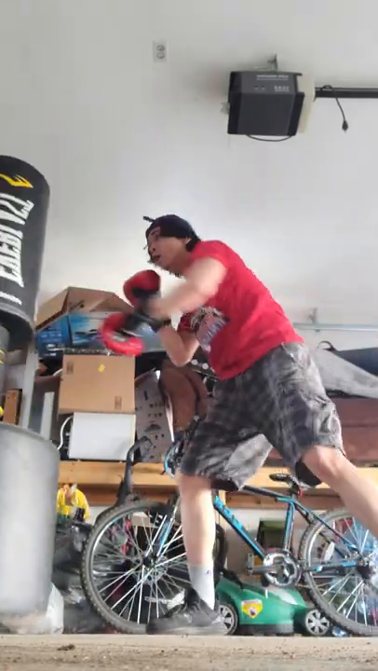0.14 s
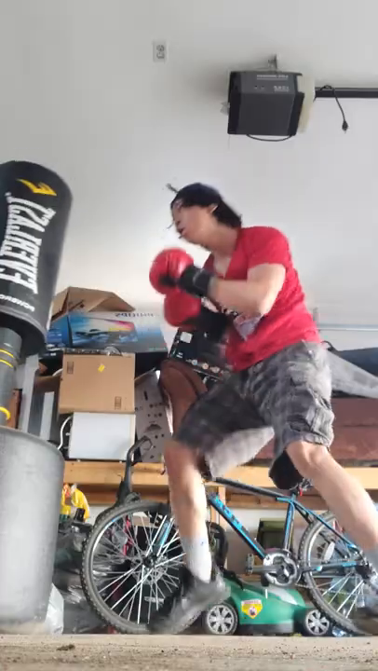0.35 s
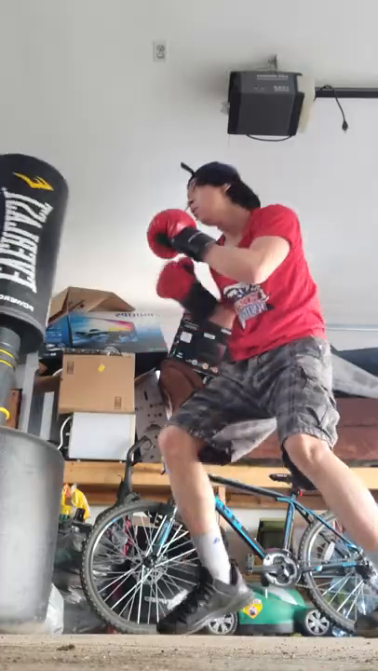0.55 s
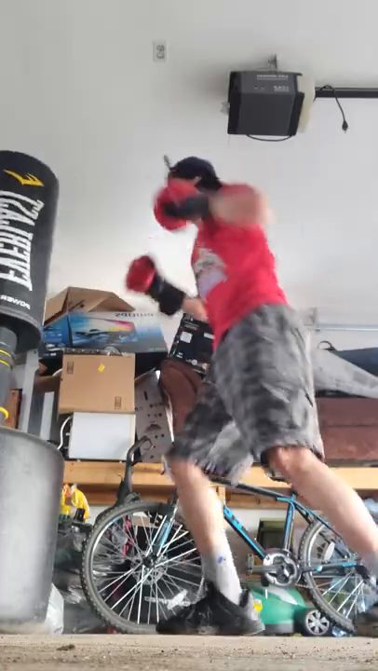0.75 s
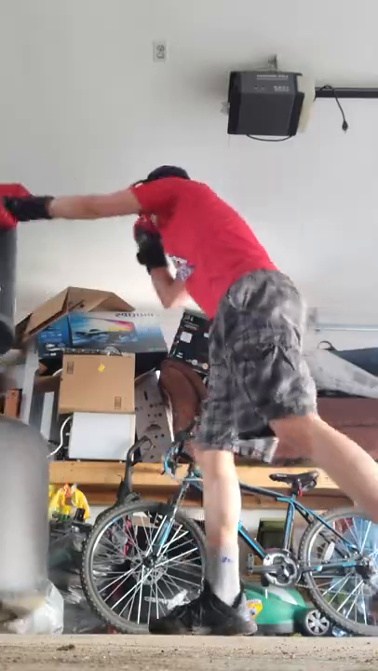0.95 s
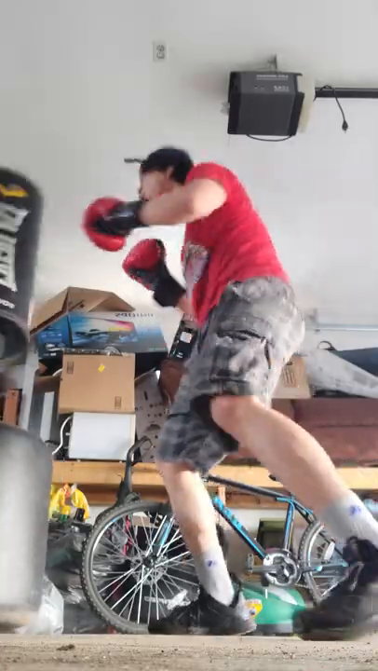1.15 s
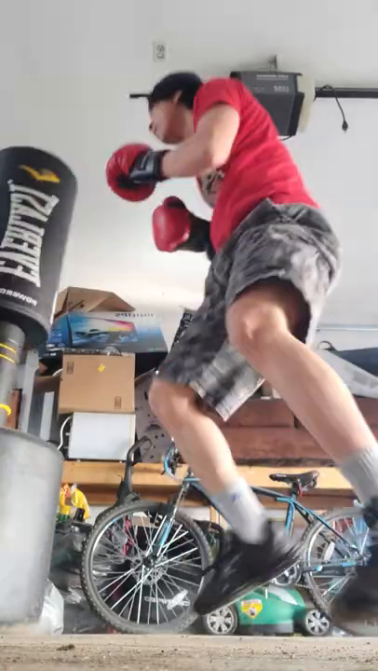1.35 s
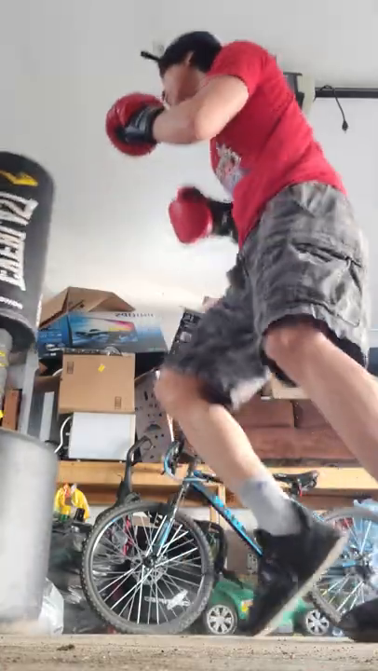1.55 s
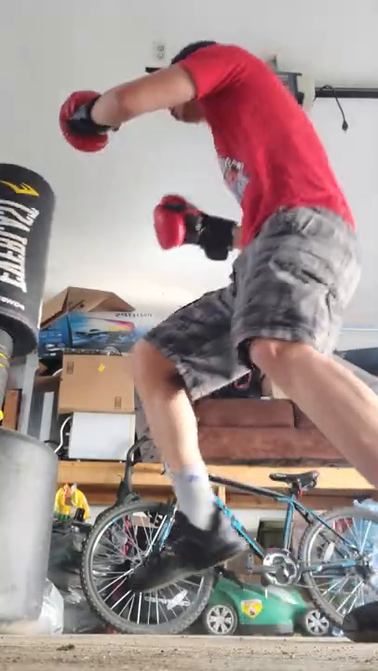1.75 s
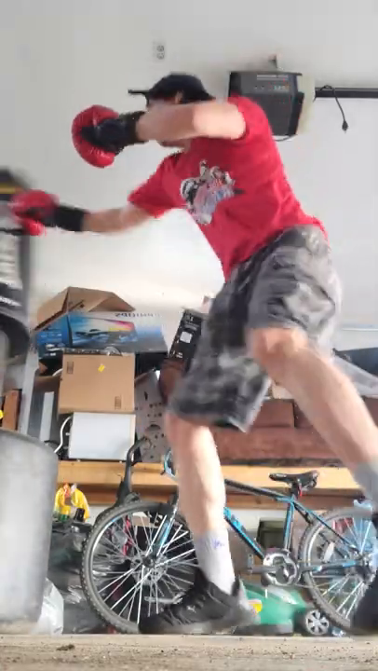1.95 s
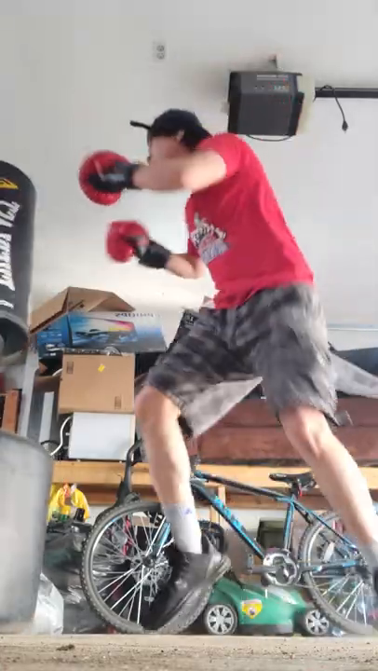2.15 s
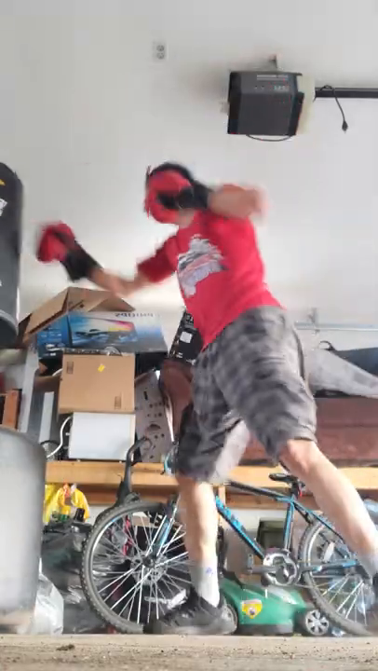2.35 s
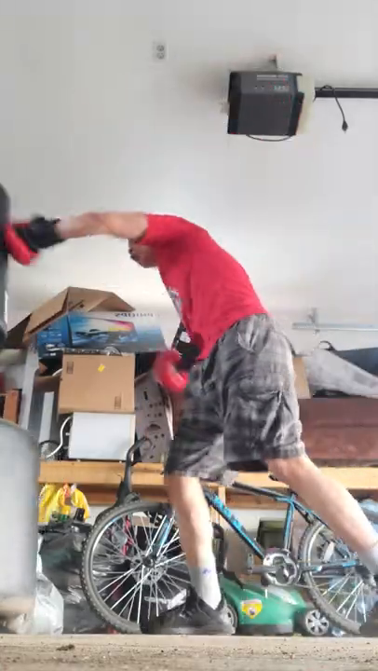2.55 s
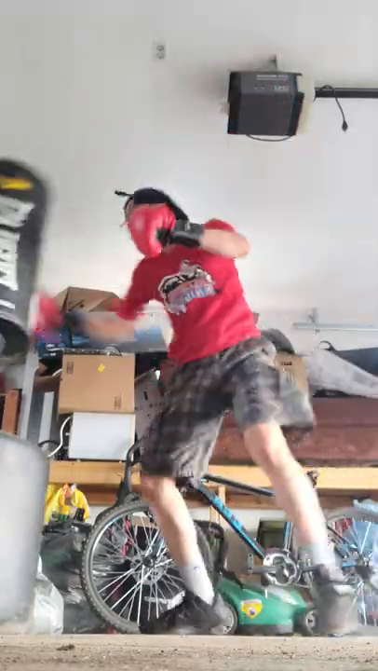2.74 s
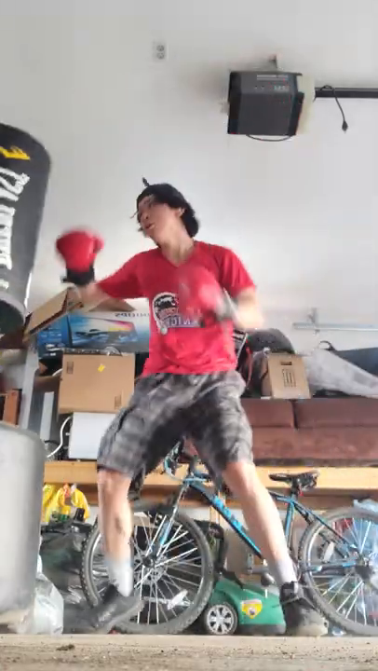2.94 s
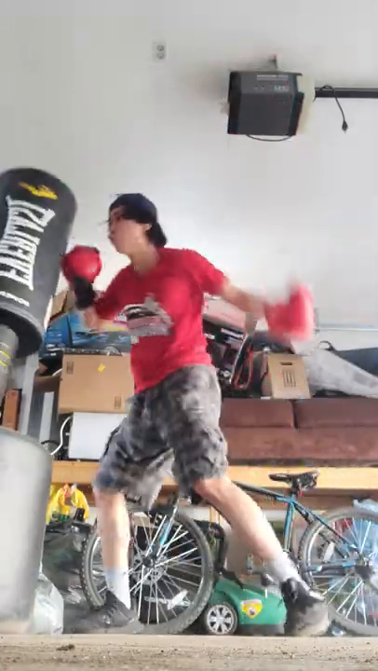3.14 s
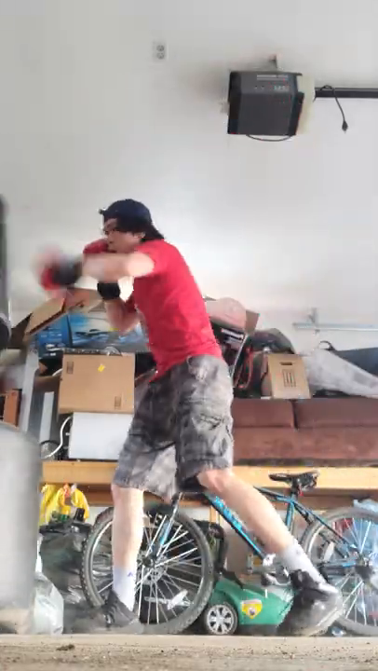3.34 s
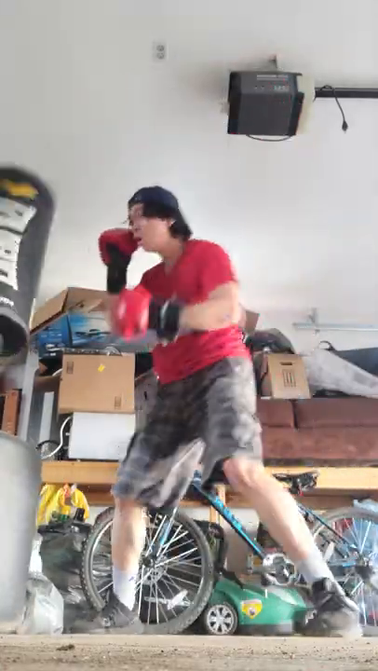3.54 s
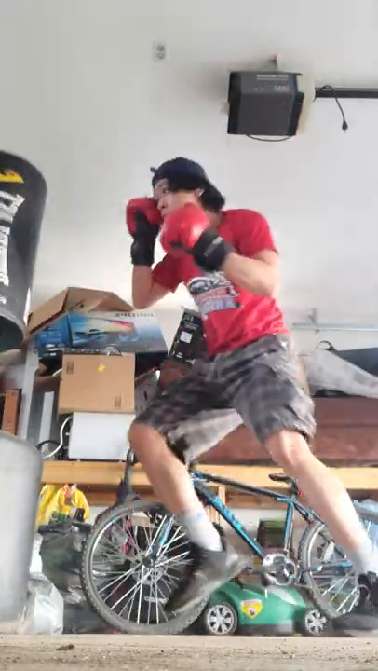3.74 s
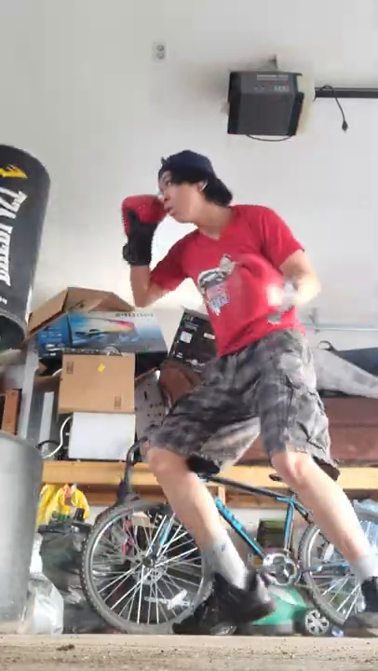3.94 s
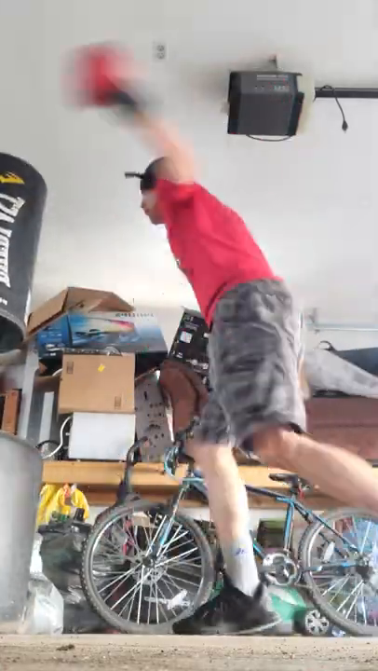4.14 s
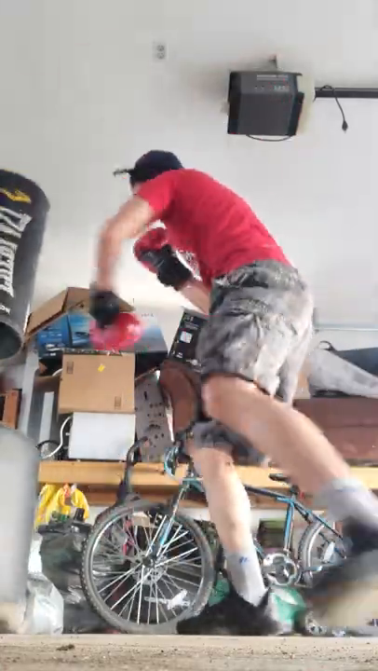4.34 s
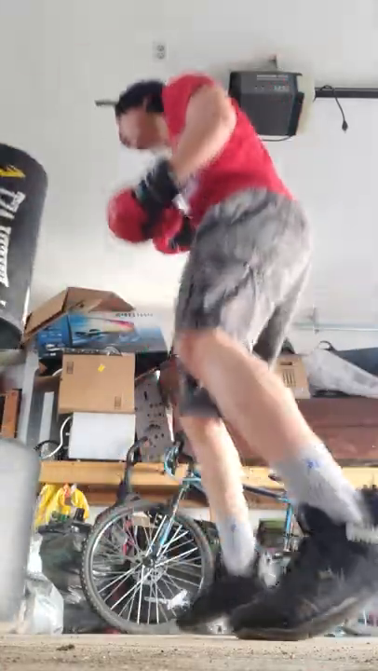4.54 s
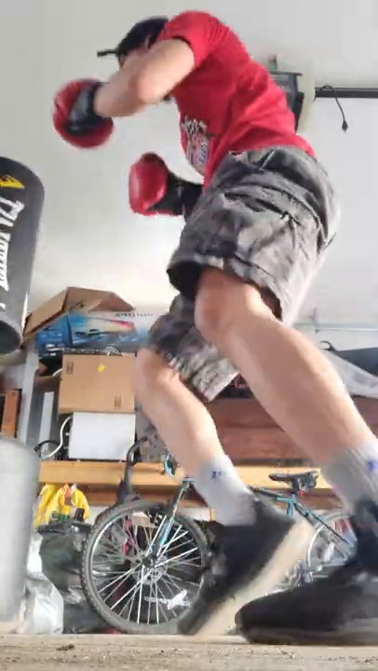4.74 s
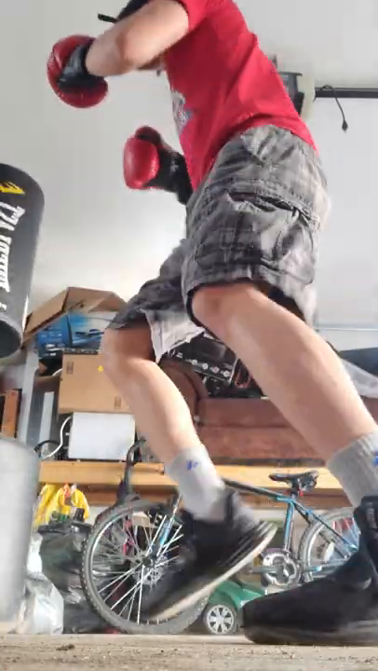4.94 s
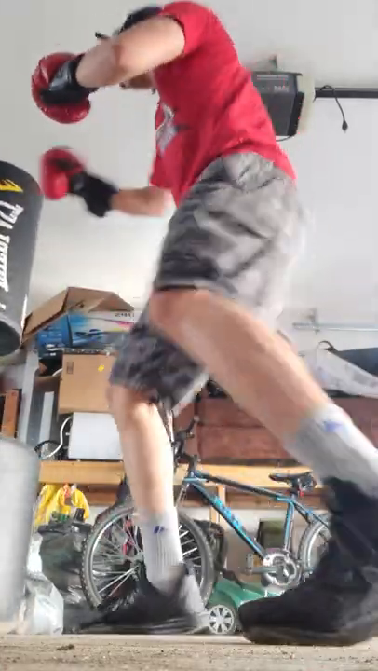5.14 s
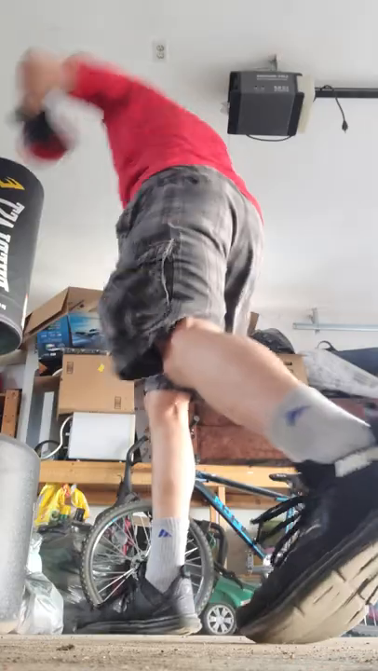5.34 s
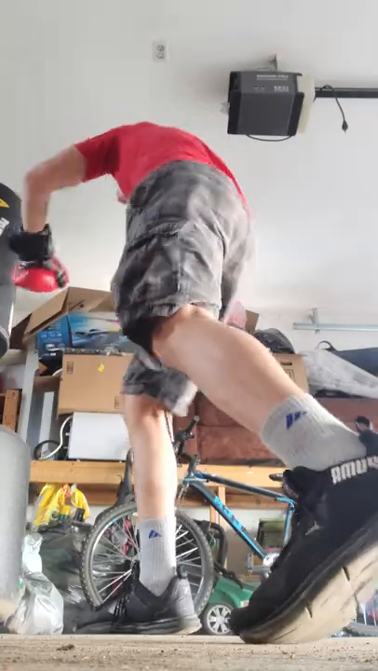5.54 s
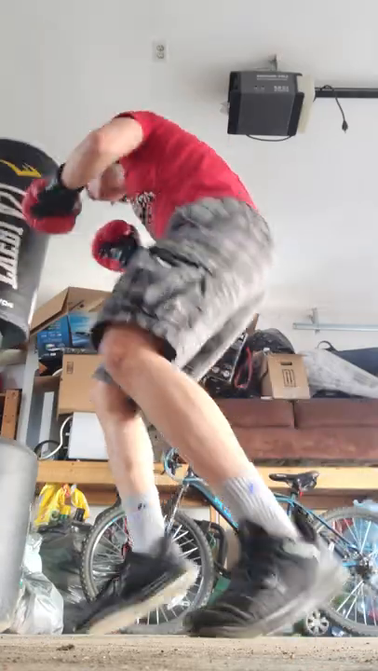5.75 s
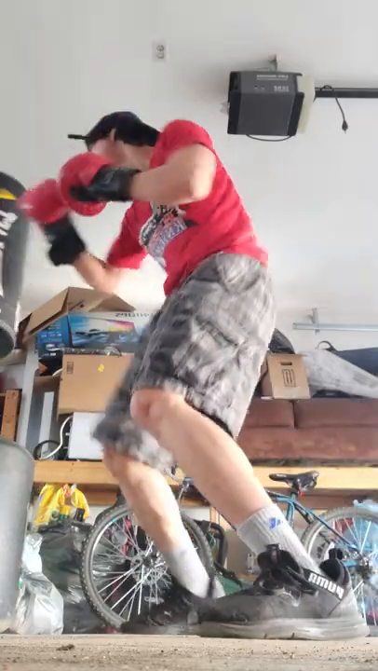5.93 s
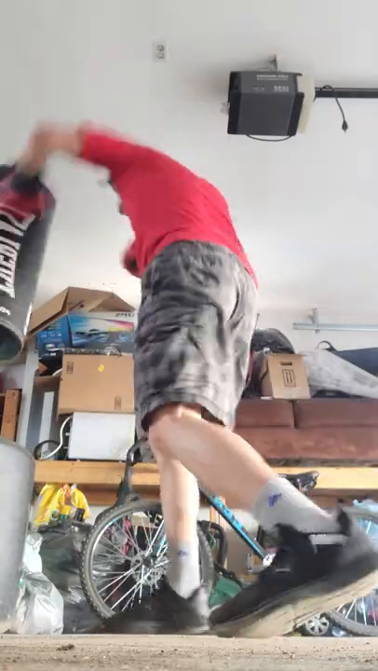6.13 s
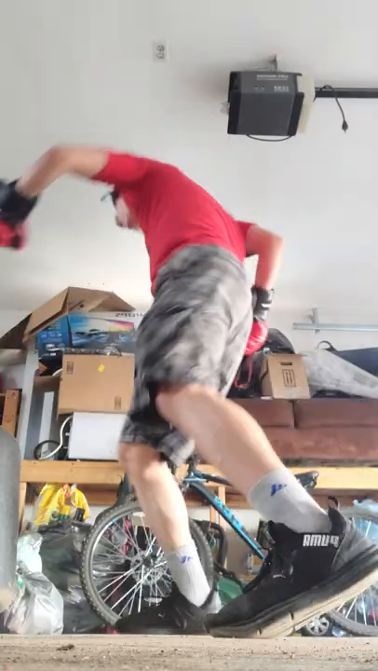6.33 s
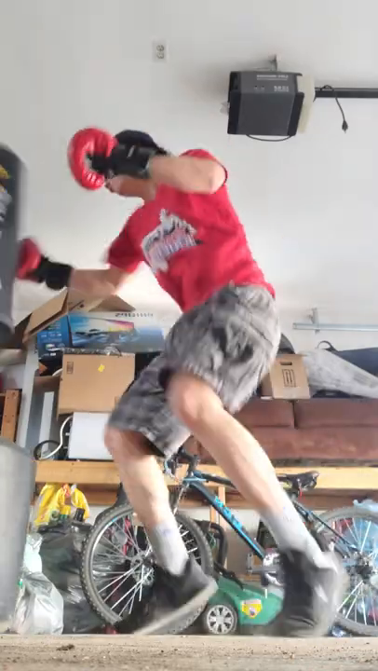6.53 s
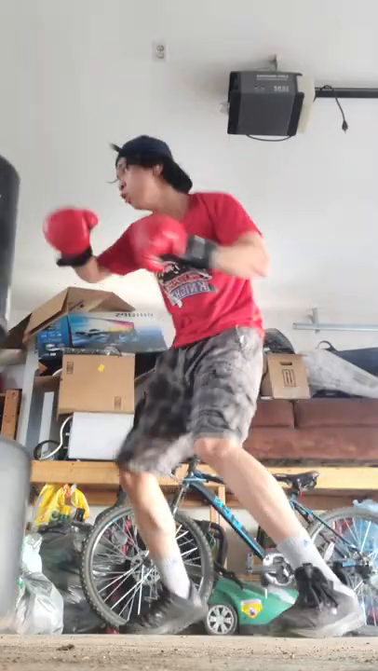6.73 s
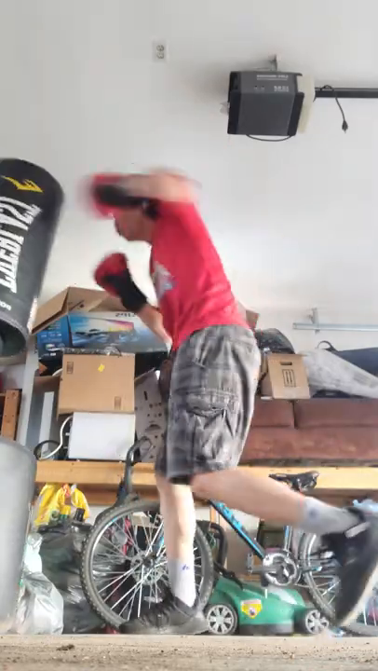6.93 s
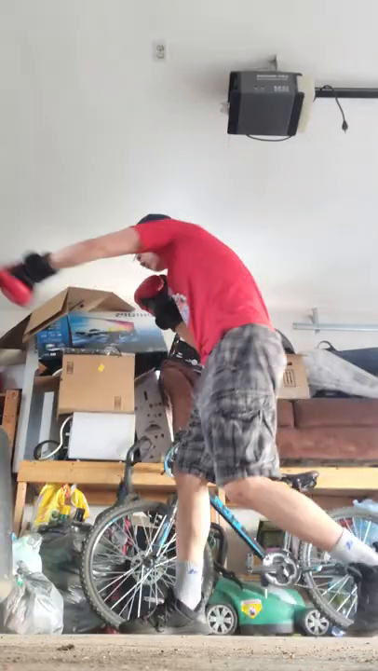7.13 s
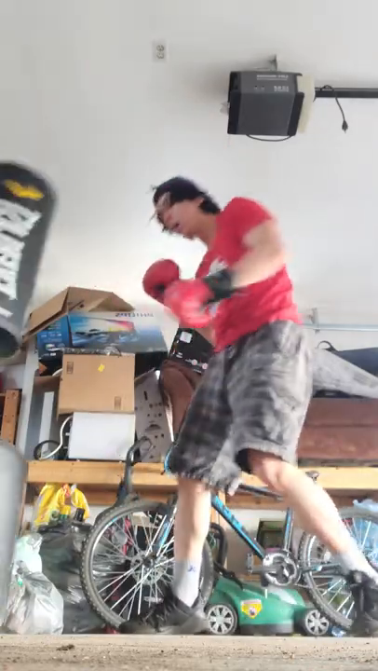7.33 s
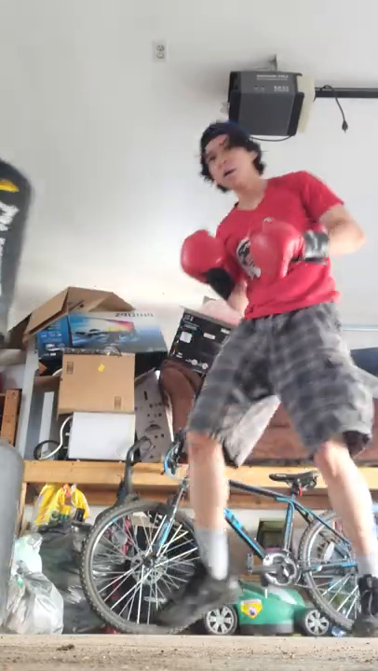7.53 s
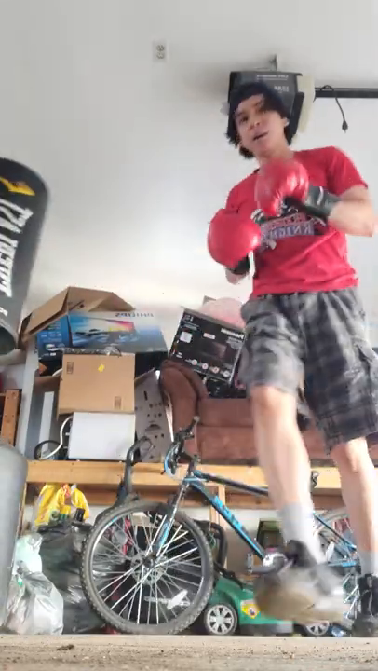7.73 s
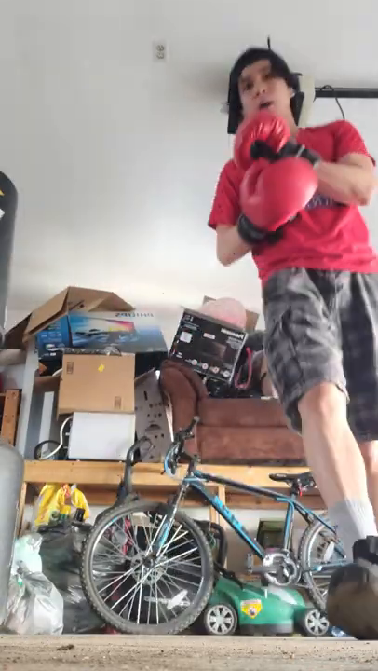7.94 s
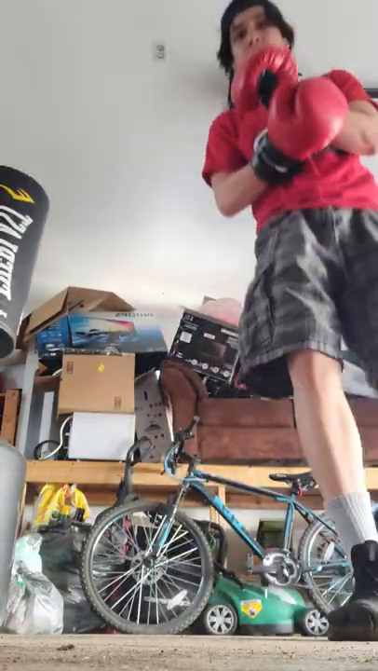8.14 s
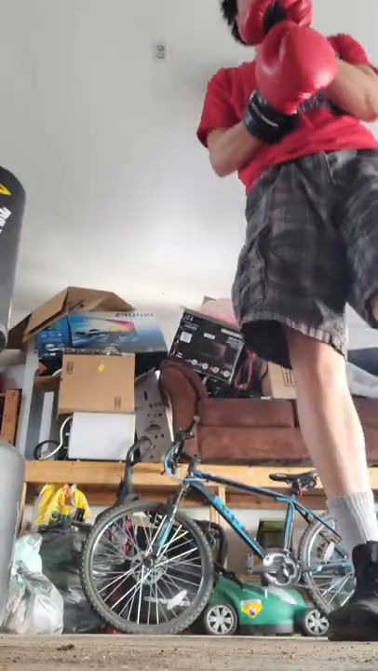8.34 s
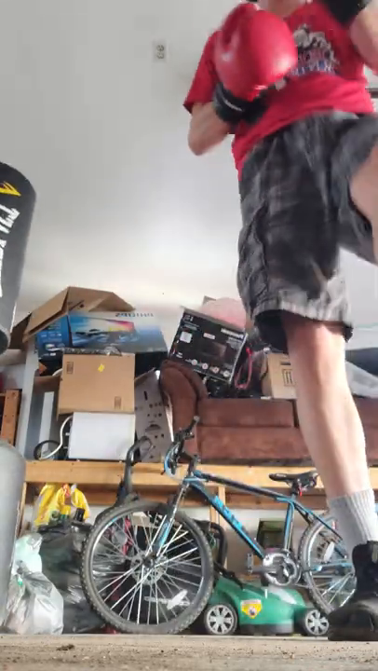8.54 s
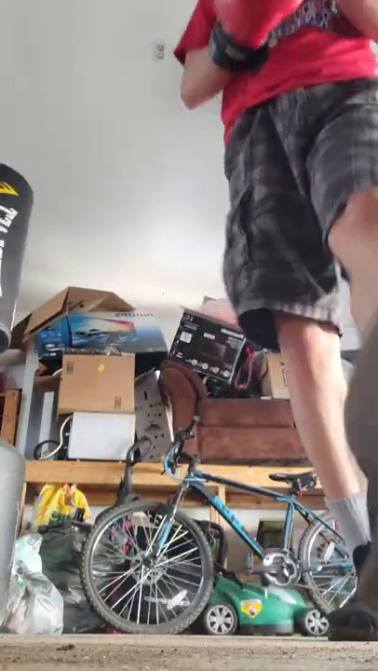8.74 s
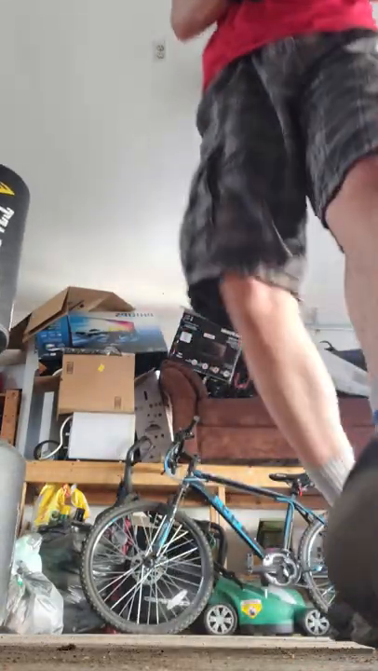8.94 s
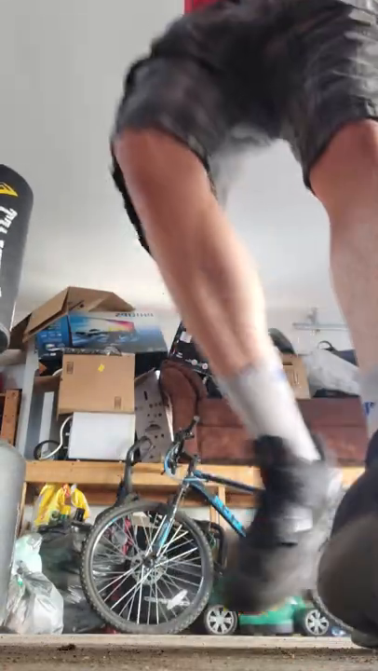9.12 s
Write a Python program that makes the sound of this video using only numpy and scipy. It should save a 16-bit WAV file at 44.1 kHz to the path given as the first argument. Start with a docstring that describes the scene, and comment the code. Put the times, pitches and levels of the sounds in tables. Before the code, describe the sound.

A boxing glove cracks against a heavy vinyl bag right at the start, and again at about 0.9 seconds. Each punch is a sharp, close slap with a low thud and boom, some trailed by a tiny squeak. A quick flurry of slightly lighter blows runs from 2 to 2.8 seconds. Hard single hits land at 3.3, 4.3 and 5.4 seconds, then three closer together at 6.2, 6.6 and 7 seconds. Throughout, the bag's weighted base and the boxer's feet thump dully on the floor, while shoes scuff, rasp and crunch grit on concrete and clothes rustle lightly. After the last punch, a few thumps fade by about 8 seconds, leaving quieter scrapes and gritty ticks until the end, just past 9 seconds. The microphone is near the feet and bag. The garage adds a short echo, with a faint steady outdoor rumble behind.

```python
"""A garage with a concrete floor: a boxer works a free-standing heavy bag, a phone lying by his feet.
Each glove cracks on the vinyl, slaps air out and sets the stuffed bag booming; the skin squeaks, and
the weighted base rocks and thumps back down. Shoes scuff over grit, and the garage answers over a
quiet outdoor rumble."""
import sys
import numpy as np
from scipy import signal
from scipy.fft import rfft, irfft, next_fast_len
from scipy.io import wavfile
from scipy.ndimage import uniform_filter1d

SR = 44100
rng = np.random.default_rng(int(sys.argv[2]) if len(sys.argv) > 2 else 0)


def store_pcm(level_fs):
    """Save levels as 16-bit WAV."""
    pcm = np.round(np.clip(level_fs, -1, 1) * 32767).astype(np.int16)
    wavfile.write(sys.argv[1], SR, np.atleast_2d(pcm).T)


N = 404823

# Gloves on the bag. Each row: start in seconds, then levels in dB of the crack, boom, slap, sizzle,
# body thud, spit, wall echo and ceiling echo.
PUNCHES = [(0.0101, -0.5, -11.5, -25, -28.5, -17, -23, -17, -17),
           (0.9026, 1.5, -14, -28, -21.5, -21.5, -11, -10.5, -18),
           (1.99, -7, -16, -27.5, -32, -15.5, -20, -27, -28),
           (2.2965, -9, -15.5, -48, -50, -20, -23, -36, -42),
           (2.51, -1.5, -12.5, -29.5, -26.5, -19, -13, -10, -18),
           (2.5454, -7, -21, -35, -29, -23, -28, -31, -36),
           (2.8203, -5, -12.5, -24, -32.5, -18, -32, -23, -28),
           (3.3319, 0, -14.5, -29.5, -20.5, -19, -7, -25, -12),
           (4.2643, 1, -15.5, -29, -27, -17.5, -22, -34, -17),
           (5.4399, 1, -18, -32, -22.5, -17, -32, -15, -18),
           (6.198, -0.5, -16.5, -34, -28, -18.5, -24, -14, -18),
           (6.5714, -3, -14, -24, -24, -18.5, -17, -24, -18),
           (7.029, -2.5, -23.5, -51, -28, -19, -10, -19, -18)]
# Base and feet landing. Each row: start in seconds, knock in dB, boom in dB, boom pitch in Hz,
# clatter in dB, knock t60 in seconds, knock brightness in dB per octave, edge in dB.
LANDINGS = [(.022, -17, -37, 81.3, -32, .16, -1.5, -31), (.039, -22.5, -16, 81, -40, 0.12, -5, -27),
            (.121, -29.5, -31, 90, -55, 0.085, 1, -20), (.222, -19, -11.5, 50.5, -32.5, 0.093, 0, -22),
            (.249, -20.5, -30, 59.6, -49, 0.14, -4, -28), (.776, -44, -35.5, 82, -71, 0.26, 0.5, -30),
            (1.031, -41, -30, 61.5, -32, 0.036, 9, -40), (1.091, -33.5, -32, 69, -62, 0.14, 0, -31),
            (1.164, -42, -50, 70, -63, .06, 6, -30), (1.245, -17, -12, 89.3, -30.5, 0.15, 1, -12),
            (1.446, -28, -16, 71.5, -40, 0.24, 2, -34), (1.605, -35.5, -32, 119, -42.5, 0.15, -0.5, -34),
            (1.853, -44, -54, 100, -50, 0.073, 2, -38), (2.098, -25.5, -22, 78, -30, 0.078, 0.5, -15),
            (2.194, -26, -16, 82, -40, 0.28, 2.5, -35), (2.328, -16, -38, 64, -35, 0.13, 1, -7.5),
            (2.346, -21.5, -40, 70, -43, 0.23, -2.5, -10.5),
            (2.544, -19.5, -21, 90, -47, 0.13, -3.5, -12.5), (2.929, -36.5, -21, 70, -55, 0.21, -4, -41),
            (3.052, -24, -16.5, 104.1, -34.5, 0.22, 3.5, -35), (3.133, -62, -21.5, 59.4, -70, 0.11, 0, -55),
            (3.595, -30, -18.5, 85.2, -42, 0.27, -1, -38), (3.795, -22, -14, 87, -31, 0.13, 0, -37),
            (3.956, -43, -51, 125, -43, 0.037, 4, -27), (4.484, -22, -25, 131.5, -37, 0.18, -1.5, -29),
            (4.538, -37.5, -22, 138, -37, 0.061, 13, -42), (4.673, -55, -28.5, 79.5, -62, 0.13, 3, -43),
            (4.793, -41, -35, 70.7, -46.5, 0.21, 4.5, -28.5), (5.189, -41, -33.5, 105, -54, 0.05, 0, -52),
            (5.625, -26, -49, 59, -55, 0.14, 2, -13.5), (5.749, -35.5, -23, 96.6, -41, 0.097, 4.5, -36),
            (5.913, -29.5, -18.5, 57.5, -40.5, 0.23, -0.5, -32),
            (5.993, -33.5, -40, 80, -59, 0.12, -4, -23.5), (6.29, -37, -46, 67.5, -40.5, 0.5, 1, -37),
            (6.392, -32, -25, 118, -58, 0.088, -2.5, -30), (6.555, -23, -9.5, 74.4, -43, 0.081, 2.5, -40),
            (6.795, -24, -27, 97.6, -37, 0.34, -2, -16), (7.044, -16, -29, 121, -26, 0.096, -1, -17),
            (7.099, -29, -38, 62, -52, 0.31, -2.5, -37), (7.157, -34, -20.5, 63.95, -57, 0.077, -4, -31),
            (7.245, -33.5, -28, 75.5, -58, 0.12, 0.5, -22),
            (7.374, -24.5, -13.5, 95.9, -35.5, .22, 1.5, -16), (7.448, -53, -28, 67, -59, 0.11, -4, -41),
            (7.582, -41, -21, 79.6, -37.5, 0.32, 4, -32), (7.621, -28.5, -21, 129.8, -49, 0.19, 0.5, -28),
            (7.757, -31, -24, 95.5, -45, 0.26, -4, -31), (7.967, -35, -53, 124, -50, 0.062, -3, -44),
            (8.291, -44, -33, 57.4, -36.5, 0.14, 3, -39), (8.626, -45, -48, 70, -60, .06, 2, -46)]
# Colour of a glove's slap, also of a landing's clatter. Each row: frequency in Hz, level in dB.
SLAP_COLOUR = [(410, 3.5), (700, -5), (1160, -3), (1320, -12), (1590, -7.5), (1990, -4), (2450, -4),
               (4210, -7), (5780, -4), (8250, -15), (11800, -7.5), (15300, -16), (16400, -8)]
# Colour of a sole on grit. Each row: frequency in Hz, level in dB.
SOLE_COLOUR = [(710, -11), (1200, -2.5), (1900, 0.5), (2500, -3.5), (3210, -5), (3470, -4.5), (3740, -7),
               (5250, -6.5), (7620, -5.5), (8690, -9.5), (12100, -7.5), (15500, -5), (16400, -82)]


def undb(db):
    return 10 ** (np.asarray(db) / 20)


def gain(table, size):
    """Gain on FFT bins from (Hz, dB) points."""
    hz, db = np.transpose(table)
    return undb(np.interp(np.log(np.fft.rfftfreq(size, 1 / SR) + 1), np.log(hz), db))


def noise(table, size, grit_db=0.):
    """Coloured noise of rms 1; grit makes it a dense stream of uneven grains."""
    fast = next_fast_len(size)
    grains = rng.standard_normal(fast) * undb(grit_db * np.minimum(rng.exponential(size=fast), 4))
    coloured = irfft(rfft(grains) * gain(table, fast), fast)[:size]
    return coloured / np.sqrt(np.mean(coloured ** 2))


def shifted(table, spread=0.093, scatter_db=1.5):
    """No two blows land on the same spot: the resonances slide a little."""
    return sorted((hz * (1 + spread * np.tanh(rng.standard_normal())),
                   db + scatter_db * rng.standard_normal()) for hz, db in table)


def split(x, hz):
    """Below and above a crossover."""
    low = signal.sosfiltfilt(signal.butter(2, hz, fs=SR, output="sos"), x)
    return low, x - low


def curve(table):
    """One scene-long line per column, through rows that open with a time in seconds."""
    times, *columns = np.transpose(table)
    return [np.interp(np.arange(N) / SR, times, column) for column in columns]


def steps(count, hold, slew):
    """Random levels, with hold and slew in samples."""
    return uniform_filter1d(np.repeat(rng.standard_normal(count), hold), slew)


def walk(rate):
    """A scene-long drift that turns rate times a second."""
    hold = int(SR / rate)
    return steps(N // hold + 1, hold, hold)[:N]


def add(track, start, sound):
    """Mix a sound in at start seconds."""
    i = int(start * SR)
    a, b = max(i, 0), min(i + len(sound), N)
    track[a:b] += sound[a - i:b - i]


def fade(t, rise, t60):
    """Swell for about rise seconds, then die away; peak 1."""
    shape = (1 - np.exp(-t / rise)) * np.exp(-np.log(1000) * t / t60)
    return shape / shape.max()


def burst(x, shape):
    """Noise under an envelope, scaled to the energy of the envelope."""
    shaped = x * shape
    return shaped * np.sqrt(np.sum(shape ** 2) / np.sum(shaped ** 2))


def swell_power(events, rise, t60):
    """Summed power of swells that follow (seconds, dB) events."""
    out, t = np.zeros(N), np.arange(SR) / SR
    for start, db in events:
        add(out, start, (undb(db) * fade(t, rise, t60)) ** 2)
    return out


def outdoor_air():
    """Outdoor rumble through the door and faint hiss; only the upper part is wide."""
    # Colour of the air. Each row: frequency in Hz, level in dB.
    air_colour = [(15, -35), (25, -5.5), (80, 3.5), (338, -14.5), (432, -10), (875, -14.5), (1120, -12.5),
                  (1590, -21.5), (7260, -41.5), (8550, -115), (12500, -66), (15100, -68), (16400, -56)]
    mid, side = noise(air_colour, N), split(noise(air_colour, N), 650)[1]
    return undb(-46.5 + walk(8.6)) * (mid + side * np.array([[1], [-1]]))


def clutter(x):
    """Quick scatter off boxes, floor and boxer, crossfading to a new pattern as he moves."""
    move_s, colour = .27, [(60, -35.5), (600, -11.0), (16000, -1.5)]
    hop, t = int(move_s * SR), np.arange(SR // 16) / SR
    shape = fade(t, 0.00034, t60=0.032)
    shape *= undb(0.5) / np.sqrt(np.sum(shape ** 2))
    x, out = np.pad(x, (hop, 2 * hop)), np.zeros((2, N + 3 * hop + len(t)))
    for i in range(0, N + hop, hop):
        scatter = np.array([noise(colour, len(t)) * shape for _ in range(2)])
        part = x[i:i + 2 * hop] * np.sin(np.pi * np.arange(2 * hop) / (2 * hop))
        out[:, i:i + 2 * hop + len(t) - 1] += signal.fftconvolve(part[None], scatter, axes=1)
    return out[:, hop:hop + N]


def garage(x):
    """Scatter off the clutter, then a diffuse tail in six bands; the bass is alike on both sides."""
    # The room's tail. Each row: band centre in Hz, t60 in seconds, level in dB.
    tail_bands = [(80, 1, -22), (213, 0.42, -9), (504, 0.71, -11.5), (1740, 0.33, -6.5), (5100, 0.25, -2.5),
                  (13300, 0.18, -3)]
    t, tail = np.arange(SR) / SR, 0
    for hz, t60, db in tail_bands:
        band = [(hz / 3.3, -40), (hz / 1.71, 0), (hz * 1.59, 0), (hz * 9.8, -40)]
        mid, side = noise(band, SR), noise(band, SR)
        pair = mid + min(hz / 600, 1) ** 1.9 * side * np.array([[1], [-1]])
        shape = fade(t, 0.00091, t60)
        share = np.sqrt(min(hz / 9000, 1) / np.sum(shape ** 2))  # evens out band width and decay
        tail = tail + undb(db) * share * shape * pair
    return signal.fftconvolve(x[None], tail, axes=1)[:, :N] + clutter(x)


def scuffs():
    """Rubber drags sand over concrete in uneven slips; clothes rustle after blows; one glove ticks."""
    # Shuffling feet and clothes. Each row: time in seconds, rustle in dB, hiss in dB relative to it.
    shuffle = [(0.0, -27, -17), (.3, -58, 1), (.46, -81, -8), (.55, -68, -5), (.65, -83, -6), (0.8, -70, 5),
               (1.2, -56, -2), (1.3, -50, -18), (1.6, -55, -4), (1.9, -55, -24), (2.14, -40, -8),
               (3.0, -46, -5), (3.7, -49, -2), (3.9, -43, -10), (4.03, -72, -6), (4.19, -90, -24),
               (4.5, -51, 11), (4.7, -75, 2), (4.83, -57, 4.5), (5.05, -88, 0), (5.22, -65, 7),
               (5.6, -53, -2), (6.0, -50.5, -1.5), (6.36, -56, 0.5), (6.7, -44, 0), (7.5, -54, -1),
               (7.72, -67, -7), (7.82, -57, -2), (8.1, -57, 1.5), (8.2, -77, -4), (8.5, -62, -4),
               (8.8, -71, -6), (9.18, -53, -8)]
    # Brief rasps: mostly soles on grit; at 2.541 s, a short 4 kHz tick of the glove cracking on the vinyl.
    # Each row: start and length in seconds, level in dB, band centre in Hz, relative hiss in dB.
    rasps = [(0.286, 0.02, -35, 3960, -6.5), (0.518, 0.02, -57, 3960, 3), (0.813, 0.094, -41.5, 3940, -3),
             (1.315, 0.041, -55, 4000, 11), (1.422, 0.059, -56, 4600, 9), (1.964, 0.058, -27.5, 4400, -1),
             (2.541, .014, -22, 4000, -20), (2.78, 0.034, -40.5, 2510, -9), (2.815, 0.02, -20, 2450, -25),
             (2.9, 0.029, -30, 5030, -37), (3.726, 0.044, -43.5, 4500, 1.5), (3.864, 0.06, -46, 4400, 1),
             (4.095, 0.11, -47, 4820, -4.5), (4.424, 0.036, -25.5, 3700, 1),
             (4.488, 0.0091, -28.5, 7040, -8), (4.635, 0.022, -47, 5500, 6.5), (4.744, 0.041, -49, 6050, 6),
             (4.939, .025, -65, 5000, 13), (5.244, 0.091, -45.5, 3930, 5), (5.31, 0.11, -38.5, 3300, -8),
             (5.76, 0.015, -37, 5000, 9), (6.094, 0.053, -31.5, 3970, -13),
             (6.128, 0.046, -27.5, 3900, -16), (6.809, 0.038, -59, 5940, 17), (6.912, 0.044, -49, 5000, 2),
             (7.112, 0.059, -34, 5160, -14), (7.563, 0.043, -50, 4500, -9), (7.758, 0.024, -49.5, 5000, 0),
             (7.965, .025, -57, 6500, 4), (8.073, .03, -51, 5500, -6), (8.23, 0.095, -45, 4540, -6),
             (8.304, 0.043, -38, 2000, -7), (8.336, 0.063, -36.5, 3360, -9), (8.448, 0.036, -42, 3500, -4),
             (8.466, 0.084, -34, 2460, -9.5), (8.818, 0.011, -33.5, 2530, 5), (9.15, 0.031, -35, 3000, -22)]
    swings = [(start, crack_db - 43.5) for start, crack_db, *_ in PUNCHES]
    swing_power = swell_power(swings, rise=0.07, t60=0.84)
    coarse, fine = split(noise(SOLE_COLOUR, N, grit_db=6.0), 7500)
    fine = fine / fine.std()
    slips = undb(3.26 * walk(200) + 4.0 * walk(30))
    rustle, hiss = undb(curve(shuffle))
    coarse_level = np.sqrt(swing_power + rustle ** 2)
    fine_level = np.sqrt(swing_power * undb(-17) ** 2 + (rustle * hiss) ** 2)
    out = slips * (coarse_level * coarse + fine_level * fine)
    for start, length, db, hz, hiss_db in rasps:
        i, size = int(start * SR), int(length * SR)
        part = slice(i, min(i + size, N))
        press = signal.windows.tukey(size, .6)[:part.stop - i]
        band = signal.iirpeak(hz, 2.5, SR)  # each rasp sings in a broad band of its own
        rasp = 0.62 * coarse[part] + 0.97 * signal.lfilter(*band, coarse[part])
        out[part] += undb(db) * press * slips[part] ** 0.72 * (rasp + undb(hiss_db) * fine[part])
    return out


def grit():
    """Single grains crack under a sole, with fainter ones scattered at random."""
    # The loudest grains. Each row: start in seconds, then the bright, dull and sharp parts in dB.
    loud_grains = [(0.2069, -32, -40, -47), (0.2305, -29, -34, -41), (0.2955, -34, -30, -44),
                   (0.4174, -52, -58, -61), (0.503, -57, -48, -68), (0.5196, -48, -52, -57),
                   (1.0047, -30, -30, -52), (1.2825, -43, -30, -51), (1.345, -43, -40, -46),
                   (1.402, -38, -47, -51), (1.4508, -23.5, -44, -20), (1.4845, -37, -37.5, -29),
                   (1.504, -40, -46, -30), (1.5878, -41, -53, -51), (1.6072, -33.5, -46, -52),
                   (1.7095, -48, -58, -50), (1.7566, -49, -38, -51), (1.8564, -57, -49, -51),
                   (1.8746, -49, -45, -49), (1.9573, -34, -39, -36), (2.6734, -35, -47, -49),
                   (2.9896, -35, -43, -31), (3.031, -34, -31, -34), (3.4827, -33, -25.5, -50),
                   (3.9574, -49, -48, -57), (4.1579, -40, -51, -48), (4.6369, -42, -48, -45),
                   (4.7463, -40, -43, -31), (4.798, -37, -43, -50), (5.0404, -56, -43, -65),
                   (5.0938, -51, -56, -52), (5.1063, -54, -62, -50), (5.1174, -63, -62, -61),
                   (5.1908, -45, -49, -36), (5.2676, -37, -46, -25), (5.285, -43, -48, -40),
                   (5.636, -38, -42, -47), (5.6518, -29.5, -28.5, -34), (5.7229, -34.5, -37, -36),
                   (5.7635, -32, -38, -29), (5.8414, -50, -53, -42), (5.9319, -28.5, -43, -42),
                   (6.107, -39, -30, -39), (6.137, -36, -22.5, -37), (6.1516, -34, -27, -38),
                   (6.3134, -36, -44, -45), (6.7511, -32, -43, -37), (7.1885, -26.5, -49, -49),
                   (7.244, -41, -51, -48), (7.2925, -32, -46, -44), (7.4894, -54, -56, -52),
                   (7.546, -42, -48, -58), (7.5832, -33.5, -47, -50), (7.7542, -38, -38, -51),
                   (7.8155, -34.5, -31, -60), (7.9354, -47, -56, -52), (7.9723, -43, -59, -53),
                   (8.226, -44, -47, -54), (8.2483, -45, -40, -50), (8.2646, -37, -44, -46),
                   (8.2773, -33, -40, -41), (8.3076, -30, -46, -38), (8.44, -44, -42, -40),
                   (8.4766, -27.5, -39, -43), (8.5525, -32, -33, -35), (8.6234, -49, -51, -45),
                   (8.6354, -56, -51, -52), (8.6814, -61, -49, -59), (8.787, -50, -49, -58),
                   (8.8239, -28.5, -26.5, -34), (8.867, -45, -46, -51), (8.9072, -41, -45, -48),
                   (8.9791, -43, -36, -44), (9.0106, -47, -47, -48), (9.0453, -41, -34, -49),
                   (9.06, -39, -42, -49), (9.1013, -44, -36, -56), (9.1313, -54, -42, -50),
                   (9.1536, -41, -44, -45), (9.1647, -40, -34, -43), (9.1754, -43, -37, -50)]
    grains_per_s, floor_db, spread_db = 3.5, -58, 6.5
    out, t = np.zeros(N), np.arange(SR // 20) / SR
    chance = rng.random((int(grains_per_s * N / SR), 4))
    faint_grains = [(when * N / SR, *(floor_db - spread_db * np.log(1 - .9 * np.array(sizes))))
                    for when, *sizes in chance]
    tick = fade(t, 0.00063, t60=0.011)
    for start, bright_db, dull_db, sharp_db in loud_grains + faint_grains:
        dull, treble = split(noise(SOLE_COLOUR, len(t), grit_db=5.0), 3900)
        bright, sharp = split(treble, 10300)
        for db, part in (bright_db, bright), (dull_db, dull), (sharp_db, sharp):
            add(out, start, undb(db) * burst(part, tick))
    return out


def rocking():
    """The weighted base rumbles on the slab, most after each blow and landing."""
    # Colour of the rumble. Each row: frequency in Hz, level in dB.
    rumble_colour = [(25, -28), (45, 4), (65, 6), (100, -3), (150, -7), (300, -28.5), (700, -42.5)]
    # The slow sway underneath. Each row: time in seconds, level in dB.
    sway = [(0, -41.5), (1.2, -46.5), (2, -40), (3.5, -34), (4.1, -41.5), (4.6, -38), (5.25, -50.5),
            (5.7, -34.5), (6.5, -44), (7.6, -39.5), (9.18, -53)]
    jolts = [(start, boom_db - 10) for start, _, boom_db, *_ in PUNCHES + LANDINGS]
    power = swell_power(jolts, rise=0.01, t60=0.33) + undb(curve(sway)[0]) ** 2
    return np.sqrt(power) * undb(2.0 * walk(14)) * noise(rumble_colour, N)


def boom(t, hz, t60, rise, glide, overtone_db):
    """The stuffed column flexes: a low swing that builds and bends upward, with a second mode."""
    phase = 2 * np.pi * hz * t * (1 + glide * t)
    swell = (1 - np.exp(-t / rise)) * fade(t, rise, t60)
    overtone = undb(overtone_db) * fade(t, 0.036, t60) * np.sin(1.85 * phase)
    return swell / swell.max() * np.sin(phase) + overtone


def landings():
    """Base and feet thump on the slab: boom, hollow knock, hard edge and a little clatter."""
    # Colour of the knock. Each row: frequency in Hz, level in dB.
    knock_colour = [(110, 7), (200, 2.5), (300, 2.5), (420, 2), (650, -4.5), (900, -4), (1300, -15.5),
                    (1800, -36)]
    out, t = np.zeros(N), np.arange(SR // 3) / SR
    for start, knock_db, boom_db, hz, clatter_db, t60, bright_db, edge_db in LANDINGS:
        low_end = boom(t, hz, 0.76 * t60, rise=0.007, glide=0.68, overtone_db=-17)
        add(out, start - .004, -undb(boom_db) * low_end)
        tilted = [(f, db + bright_db * np.log2(f / 400)) for f, db in knock_colour]
        jolts = undb(1.86 * steps(60, hold=330, slew=150)[:len(t)])  # the load settles unevenly
        knock = jolts * noise(shifted(tilted), len(t))
        add(out, start, undb(knock_db) * burst(knock, fade(t, 0.0049, t60)))
        # the hard edge meets the concrete in one short push
        edge_hz = 600 * (1 + 0.23 * np.tanh(rng.standard_normal()))
        edge = np.sin(2 * np.pi * edge_hz * t) * fade(t, 0.00066, t60=0.0058)
        add(out, start + 0.002915, undb(edge_db) * edge)
        clatter = split(noise(SLAP_COLOUR, len(t), grit_db=3.0), 3840)[0]
        add(out, start, undb(clatter_db) * clatter * fade(t, 0.0041, 1.37 * t60))
    return out


def squeaks():
    """The vinyl sticks and slips in short wavering tones as the bag bends and slides."""
    # Each row: start and length in seconds, opening and closing pitch in Hz, level in dB.
    chirps = [(0.032, 0.045, 2950, 2750, -32), (0.059, 0.051, 2900, 3200, -33.5),
              (.062, 0.035, 2340, 2360, -36), (0.087, 0.035, 860, 880, -50),
              (0.964, 0.039, 2700, 2890, -33), (0.989, 0.04, 2940, 3040, -31.5),
              (0.237, .022, 2350, 2450, -40), (0.981, 0.027, 1370, 1380, -32),
              (1.0, 0.033, 1790, 1850, -42), (1.131, 0.048, 1400, 1370, -46),
              (1.253, 0.035, 680, 647, -22.5), (1.257, 0.027, 2400, 2360, -43),
              (2.036, 0.055, 3000, 2680, -35), (2.259, 0.021, 1850, 1950, -42.5),
              (3.333, 0.029, 1355, 1400, -32), (4.275, 0.069, 3020, 2970, -38),
              (4.283, 0.04, 1930, 1930, -34), (4.3, 0.093, 810, 780, -38), (5.434, 0.038, 1223, 1265, -32),
              (5.501, 0.026, 3110, 3150, -35), (7.05, .035, 1045, 1140, -32), (7.077, 0.1, 900, 913, -32),
              (7.16, 0.045, 680, 700, -44)]
    out = np.zeros(N)
    for start, length, from_hz, to_hz, db in chirps:
        size = int(length * SR)
        waver = uniform_filter1d(rng.standard_normal((2, SR // 8)), 120)[:, :size] * np.sqrt(120)
        hz = np.linspace(from_hz, to_hz, size) * (1 + 0.012 * waver[0])
        level = undb(db + 3.9 * waver[1]) * signal.windows.tukey(size, .6)
        add(out, start, level * np.sin(2 * np.pi * np.cumsum(hz) / SR))
    return out


def punches():
    """A glove sinks into the bag: the skin rings, air slaps out, the stuffing thuds and booms."""
    # Modes of the vinyl skin. Each row: pitch in Hz, level in dB, t60 in seconds.
    skin_modes = [(1360, 4, 0.018), (1823, 0, 0.027), (3080, -4, 0.011), (3800, 4, 0.0021),
                  (4420, -17, 0.011)]
    # Colour of the body thud. Each row: frequency in Hz, level in dB.
    thud_colour = [(59, 1), (100, -1.5), (312, -15), (402, -14.5), (520, -14.5), (660, -14), (820, -15),
                   (1600, -34.5), (2080, -28.5), (3520, -120)]
    ring_db, rub_s = -23.5, 0.015
    out, t = np.zeros(N), np.arange(SR // 3) / SR
    for start, crack_db, boom_db, slap_db, sizzle_db, thud_db, *_ in PUNCHES:
        for hz, db, t60 in skin_modes:
            detune, accent = rng.standard_normal(2)
            ring = np.sin(2 * np.pi * hz * (1 + 0.06 * detune) * t) * fade(t, 0.0007, t60)
            add(out, start, -undb(crack_db + ring_db + db + 2.5 * accent) * ring)
        colour = shifted(SLAP_COLOUR, spread=0.03, scatter_db=0.1)
        slap, sizzle = split(noise(colour, len(t), grit_db=5.0), 3430)
        slap, sizzle = undb(slap_db) * slap, undb(sizzle_db) * sizzle
        # the glove lands in a few patches, so the slap flutters
        flutter = undb(4.7 * steps(200, hold=150, slew=60)[:len(t)])
        add(out, start, undb(slap_db) * burst(flutter * slap, fade(t, 0.0051, t60=0.2)))
        add(out, start, flutter * sizzle * fade(t, 0.0048, t60=0.061))
        # padding starts to give and rub before the vinyl cracks
        thud = burst(noise(shifted(thud_colour), len(t)), fade(t, 0.0047, t60=0.41))
        add(out, start - .005, undb(thud_db) * thud)
        rub = (t < rub_s) * (t / rub_s) ** 0.5
        add(out, start - rub_s, rub * (undb(3) * slap + undb(-14) * sizzle))
        low_end = boom(t, hz=67.34, t60=0.14, rise=0.0079, glide=0.98, overtone_db=-9)
        add(out, start - .001, -undb(boom_db) * low_end)
    return out


def spit(t, above_hz):
    """A tiny bright spurt of escaping air."""
    return burst(split(rng.standard_normal(len(t)), above_hz)[1], fade(t, 0.00038, t60=.006))


def cracks():
    """Trapped air cracks and spits from under each glove; a wall and the ceiling throw it back."""
    push_s, wall_s, ceiling_s = .0022, .0048, .0126
    direct, echoes, t = np.zeros(N), np.zeros((2, N)), np.arange(SR // 50) / SR
    # a pressure step that relaxes at once, on a short push of the padding
    band = signal.butter(2, [120, 14000], "band", fs=SR, output="sos")
    step = signal.sosfilt(band, -np.exp(-t / .00014))
    push = undb(-9) * np.sin(np.pi * np.minimum(t / push_s, 1))
    crack = step / np.abs(step).max() - push
    for start, crack_db, *_, spit_db, wall_db, ceiling_db in PUNCHES:
        add(direct, start, undb(crack_db) * crack)
        add(direct, start + .0003, undb(spit_db) * spit(t, above_hz=4500))
        for side in echoes:
            add(side, start + wall_s, undb(wall_db) * spit(t, above_hz=2590))
            for delay_s, db in (ceiling_s, 0), (.0187, -4), (.0257, -9):  # ceiling, two later echoes
                add(side, start + delay_s, undb(ceiling_db + db) * spit(t, above_hz=3500))
    return direct, echoes


def ports(x, lag_ms, bent_ms=0., bent_share=0.):
    """Two microphone ports: the left is offset by lag_ms and may hear highs bent round the phone."""
    size = next_fast_len(N)
    hz = np.fft.rfftfreq(size, 1 / SR)
    bent = bent_share * hz ** 2 / (hz ** 2 + 360 ** 2)
    paths = np.exp(-2j * np.pi * hz * lag_ms / 1000) + bent * np.exp(-2j * np.pi * hz * bent_ms / 1000)
    left = irfft(rfft(x, size) * paths / np.sqrt(1 + bent ** 2), size)[:N]
    return np.array([left, x])


def scene():
    """Bag and feet close to the phone, with the garage and the outdoor air around them."""
    bag = punches() + landings() + rocking()
    boxer = scuffs() + grit()
    crack, echoes = cracks()
    squeak = squeaks()
    room = garage(bag + 0.55 * boxer + 0.38 * squeak + .45 * crack)
    bag_position = dict(lag_ms=-0.065, bent_ms=0.447)
    close = ports(bag + squeak, **bag_position, bent_share=0.99)
    close += ports(crack, **bag_position, bent_share=.55)
    close += ports(boxer, lag_ms=0.2423)
    return close + echoes + room + outdoor_air()


def record(dry):
    """The phone colours each side, loses the deepest bass, clips the loudest peaks and cuts the top."""
    # Colour common to both ports. Each row: frequency in Hz, gain in dB.
    port_colour = [(100, 1.5), (7000, 0), (8600, -10), (10200, -1), (12500, -4), (15000, -6.5)]
    # Balance of the ports. Each row: frequency in Hz, left over right in dB.
    port_balance = [(60, .5), (125, 1), (250, -2), (500, -1.5), (1000, 0), (2000, .5), (4500, 3),
                    (8000, -1), (14000, -1)]
    size = next_fast_len(N)
    tilt = np.sqrt(gain(port_balance, size))
    coloured = irfft(rfft(dry, size) * gain(port_colour, size) * np.array([tilt, 1 / tilt]), size)[:, :N]
    low_cut = signal.butter(4, 36, "high", fs=SR, output="sos")
    high_cut = signal.ellip(10, .2, 80, 15900, fs=SR, output="sos")
    clipped = np.clip(signal.sosfilt(low_cut, coloured), -.95, .95)
    return signal.sosfilt(high_cut, clipped)


dry = scene()
out = record(dry)
store_pcm(out)
```